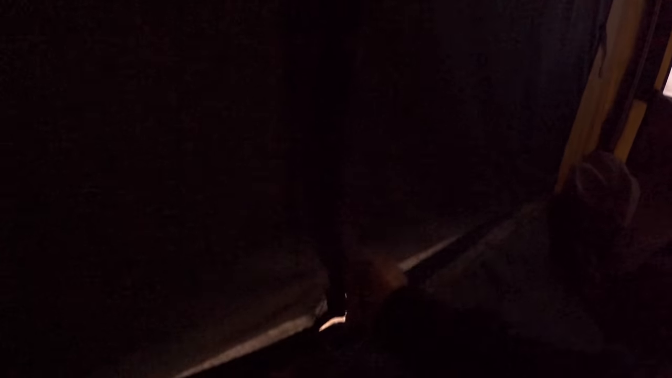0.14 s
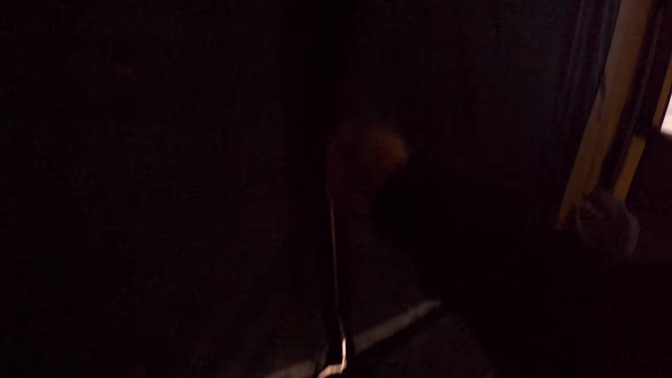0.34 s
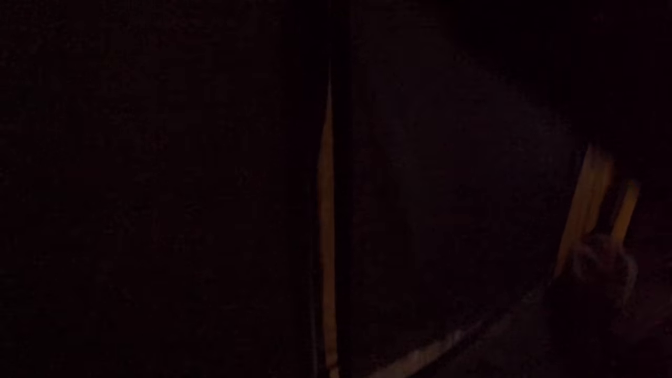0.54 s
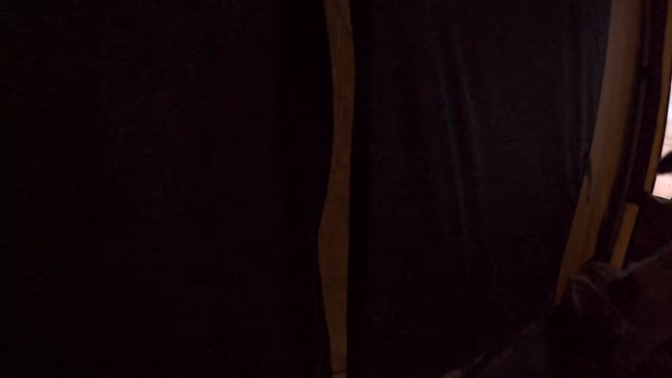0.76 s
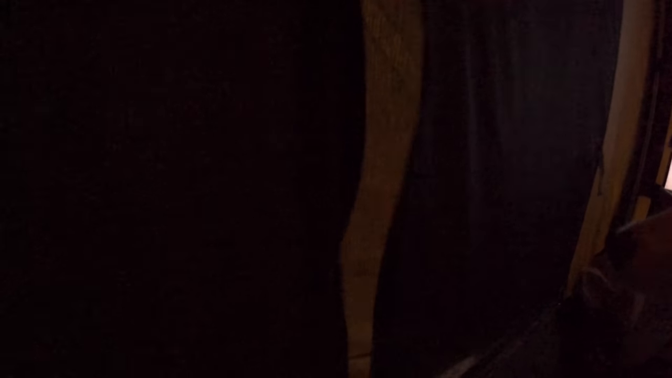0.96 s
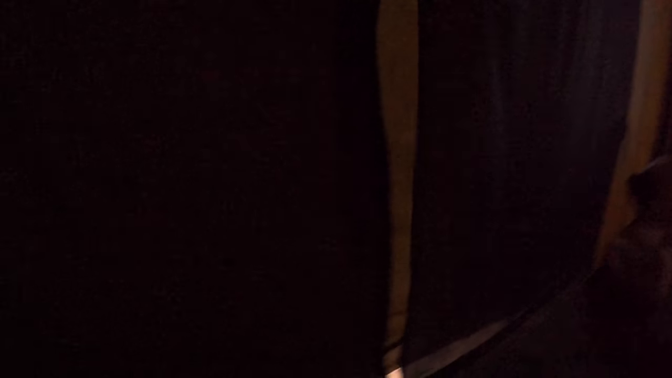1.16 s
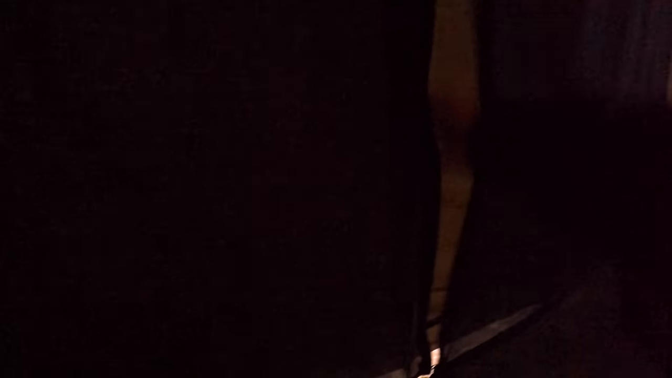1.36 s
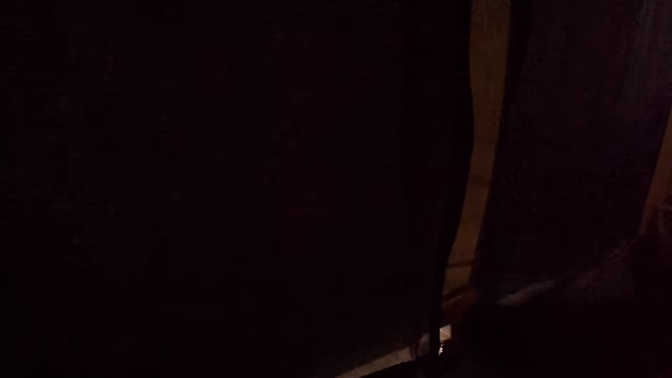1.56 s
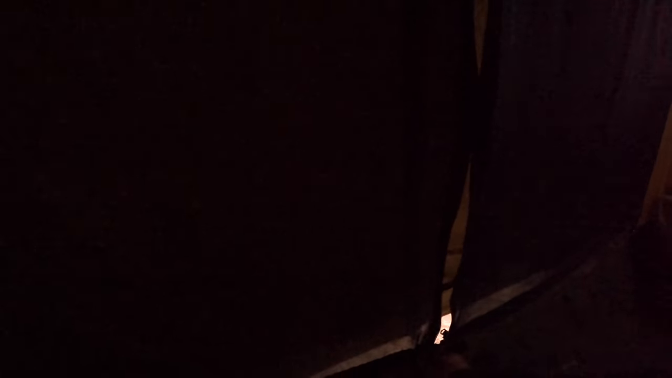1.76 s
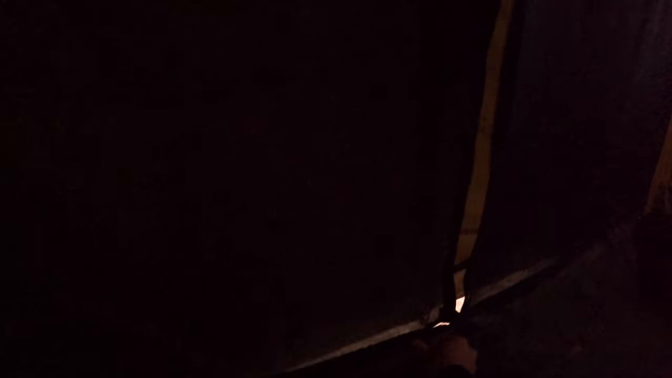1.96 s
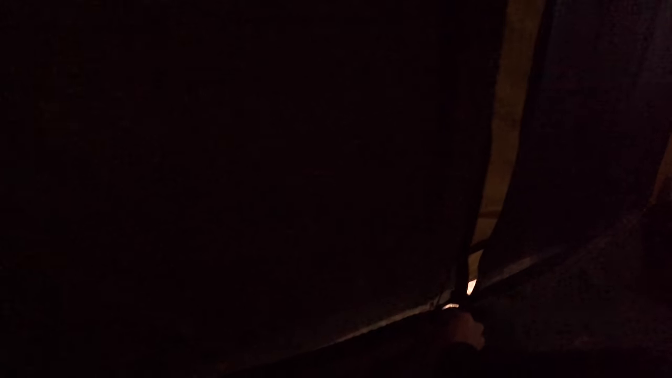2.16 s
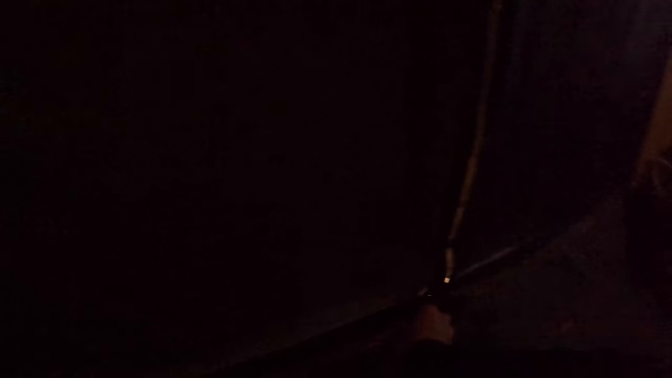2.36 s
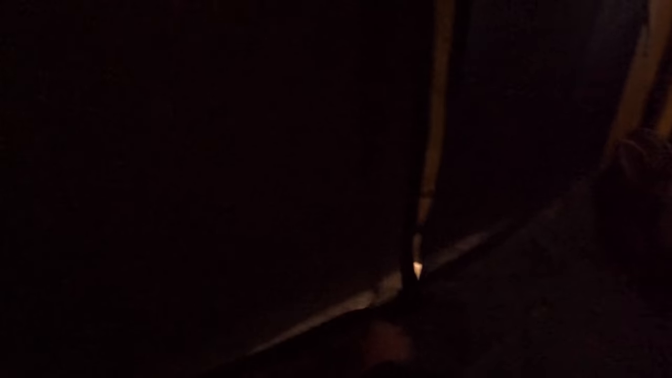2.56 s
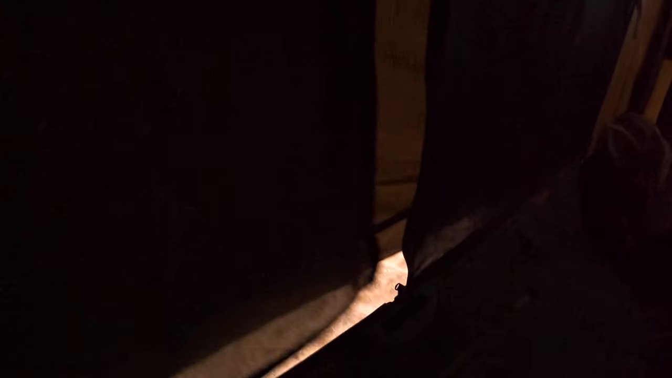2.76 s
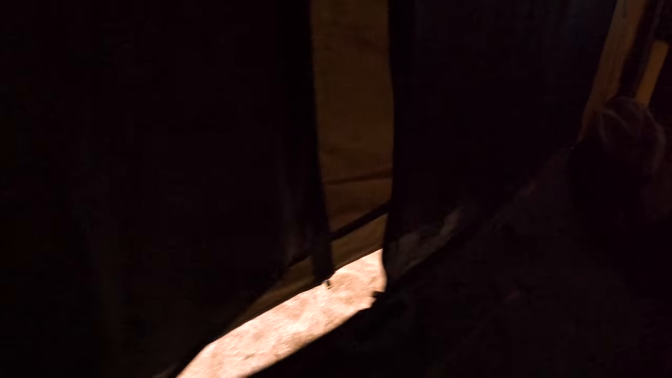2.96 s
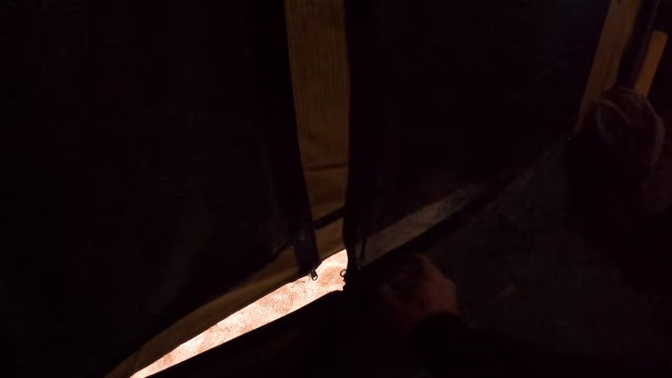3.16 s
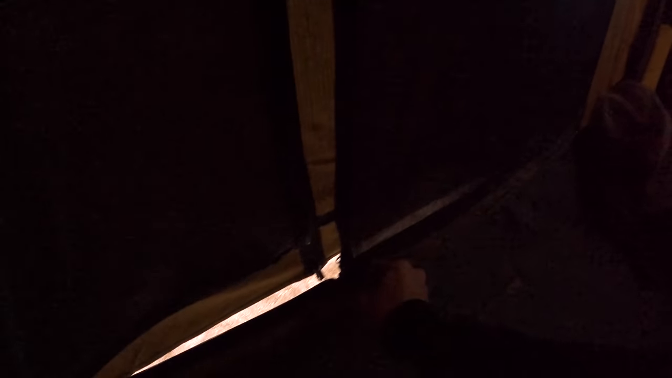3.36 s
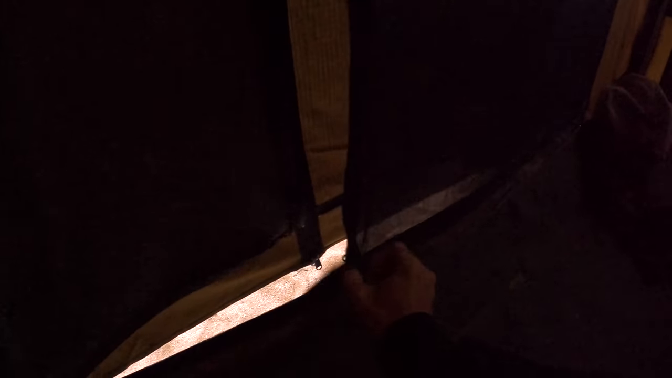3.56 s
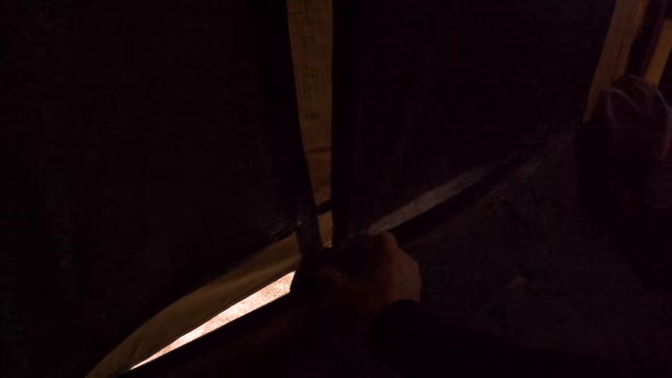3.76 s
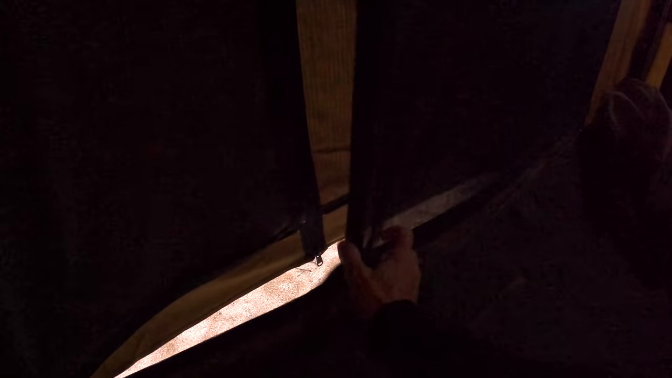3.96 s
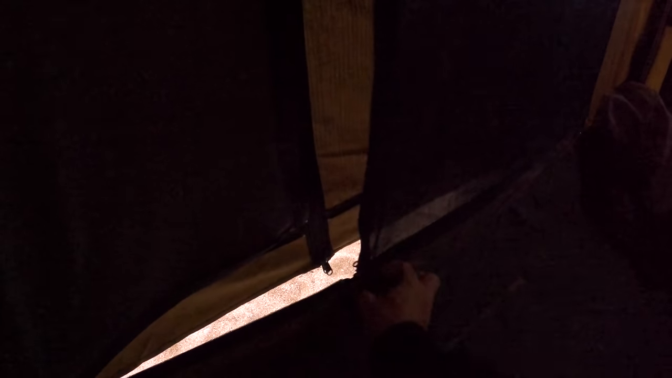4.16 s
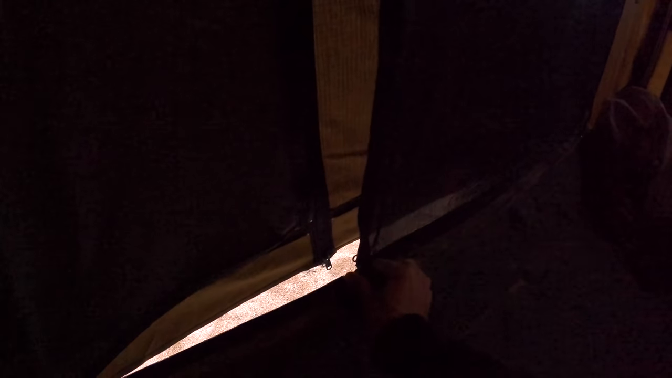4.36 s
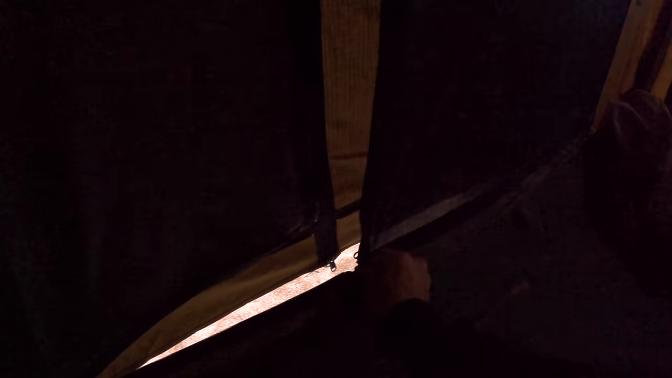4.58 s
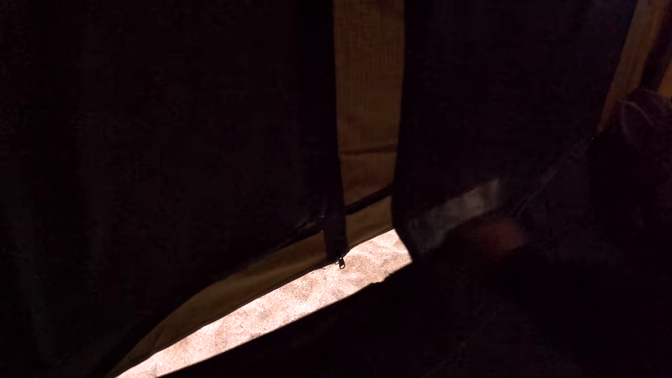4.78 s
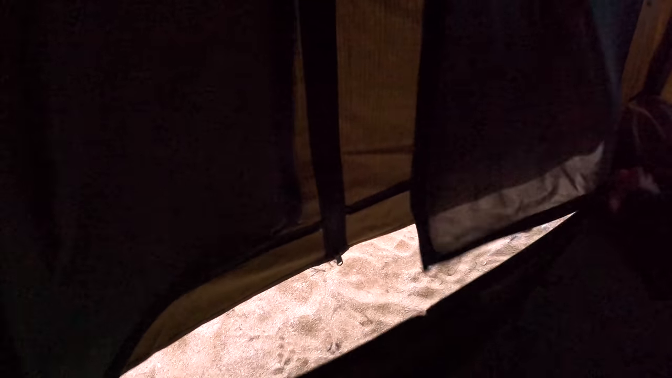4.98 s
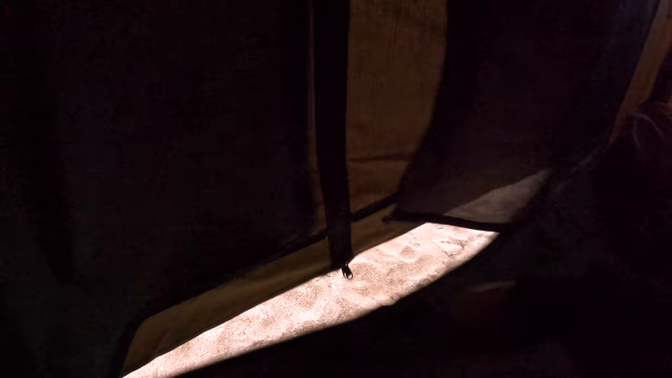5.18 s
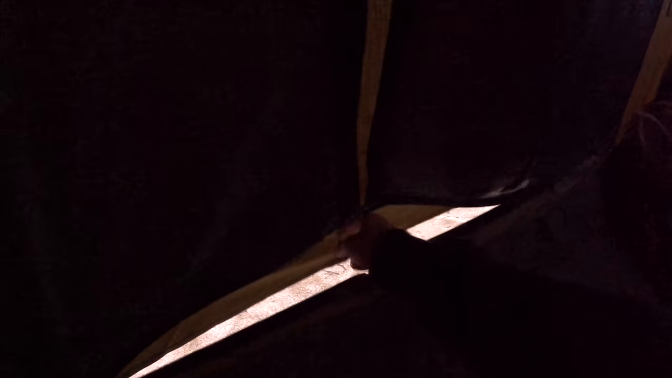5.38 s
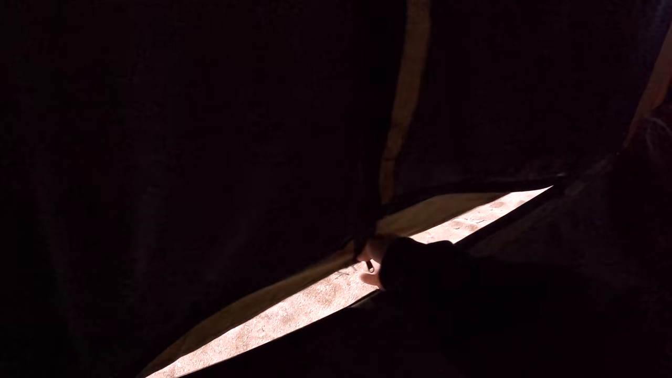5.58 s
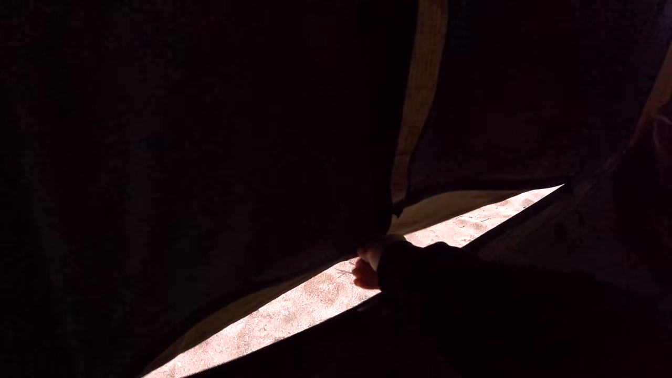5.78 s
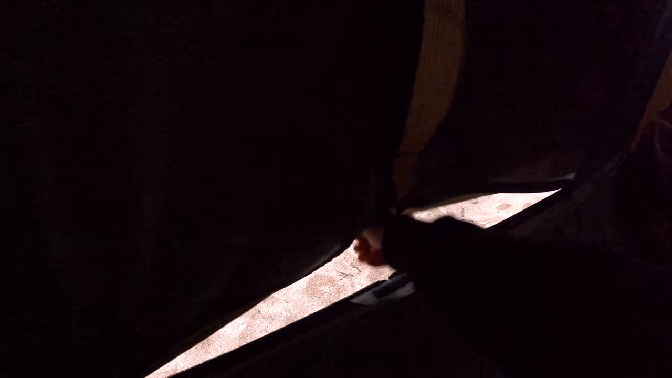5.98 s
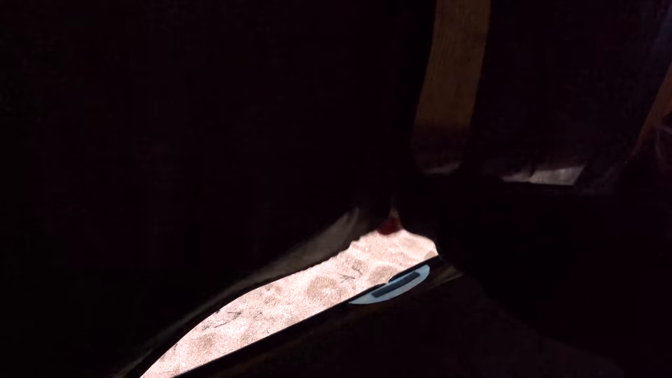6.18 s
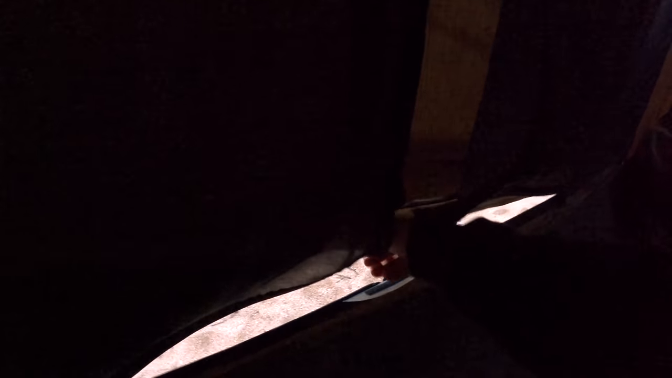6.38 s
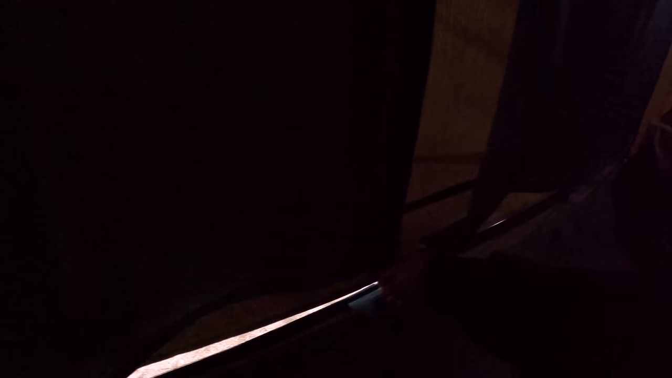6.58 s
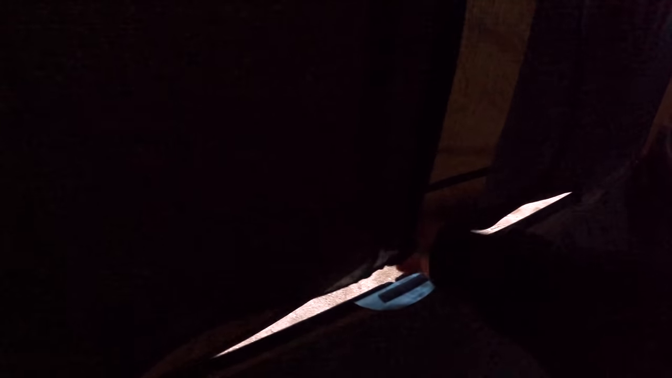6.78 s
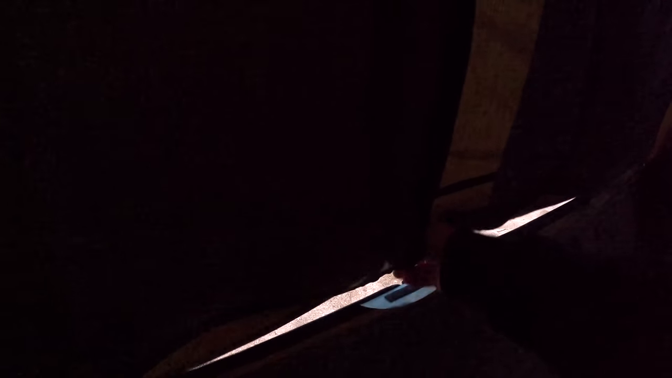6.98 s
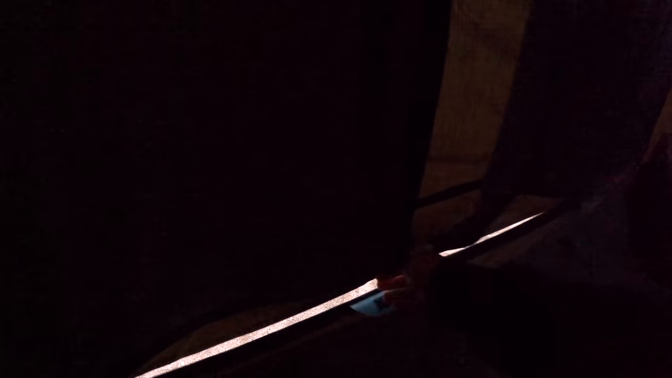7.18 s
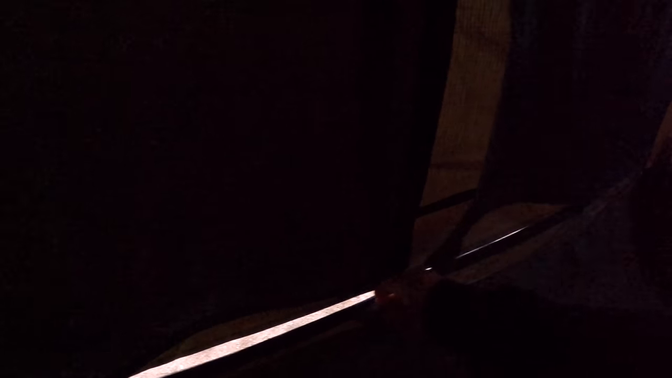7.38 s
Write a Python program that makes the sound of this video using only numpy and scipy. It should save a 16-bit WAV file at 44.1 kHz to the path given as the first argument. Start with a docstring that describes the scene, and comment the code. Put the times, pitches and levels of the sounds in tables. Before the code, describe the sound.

Close, dry stereo sound inside a tent, with a steady low outdoor rumble and faint hiss throughout. Light cloth movement and tiny high metal tab clinks open the scene. From about 0.2 to 1.1 s a zipper is pulled in one long stroke: teeth click, speed up and fuse into a buzzing whine that holds, brightens, then drops as it stops. Between 1.1 and 1.8 s come tab ticks, soft low fabric flaps and rustling, then a quieter pause. At 2.7 s a short, louder zip rises and falls in 0.3 s. From 3.2 to 4.4 s the cloth is rubbed, with brief squeaks, small snaps, tinkles and low flaps. Another sharp short zip comes at 4.85-5.15 s, ending in a dry snap. Scuffs and clinks continue to 5.7 s; afterwards sparse faint rubbing, a soft flap at 6.2 s and tab ticks near 6.5-6.7 s thin out over the rumble.

```python
"""Inside a tent the cloth is handled and metal pull tabs tinkle as decaying modes; this recurs between strokes.
First a zipper is pulled in one long stroke up the door, then two short strokes follow along its foot.
In each, teeth click through the slider and fuse into a whine whose pitch rises and falls with its speed.
Throughout, shaped noise gives a low steady rumble from outdoors."""
import sys
import numpy as np
from scipy import signal
from scipy.fft import rfft, irfft, next_fast_len
from scipy.io import wavfile
from scipy.ndimage import uniform_filter1d

SR = 44100
rng = np.random.default_rng(int(sys.argv[2]) if len(sys.argv) > 2 else 0)


def digitize_waveform(pressure):
    """Quantize a signal to 16-bit integers and store it at the path in sys.argv[1].

    Rows of a 2-D input are taken as channels; values are limited to [-1, 1].
    """
    field = np.atleast_2d(pressure).T
    bounded = np.clip(field, -1, 1)
    quanta = np.round(bounded * 32767).astype(np.int16)
    wavfile.write(sys.argv[1], SR, quanta)


N = 328041
TIME = np.arange(N) / SR

# speed of the slider in each stroke: time_s, tooth_rate_per_s
UP_PULL = [(0.22, 180), (0.32, 490), (0.385, 810), (0.425, 865), (0.46, 990), (0.51, 1040), (0.57, 1030),
           (0.66, 1085), (0.73, 1000), (0.91, 1100), (0.97, 1000), (1.005, 650), (1.08, 99)]
LEFT_PULL = [(2.665, 169.8), (2.72, 597.6), (2.755, 937), (2.815, 1215), (2.865, 1262), (2.895, 983),
             (2.925, 573), (2.965, 161.1)]
RIGHT_PULL = [(4.845, 189.7), (4.89, 571.3), (4.935, 934), (4.972, 1297), (4.99, 1233), (5.012, 1362),
              (5.035, 1361), (5.06, 1061), (5.085, 607), (5.15, 144.4)]
# colour of the zipper tape in each stroke: frequency_hz, density_db (per Hz, relative)
UP_TAPE = [(300, -24), (700, -20), (1100, -4), (1900, 2.5), (2700, -3), (4000, -5), (5500, -3),
           (7200, -7.5), (9000, -12.5), (10700, -15.5), (12000, -22), (15000, -31)]
LEFT_TAPE = [(300, -11), (700, -2), (1100, -3), (1600, -3), (2400, -1.5), (3700, 2), (5000, -0.5),
             (7000, -6), (8500, -12), (11000, -16.5), (15000, -30)]
RIGHT_TAPE = [(300, -24), (700, -8), (1100, -0.5), (2100, 4.5), (3100, -2.5), (4000, -1), (5400, -2),
              (7800, -6.5), (9500, -12), (12500, -18.5), (15000, -31)]
# balance of each stroke, the treble leaning right: frequency_hz, left_minus_right_db
UP_LEAN = [(1000, -1), (2400, 0.5), (4400, -2), (8000, -4.5), (15000, -3)]
LEFT_LEAN = [(1000, -1), (3500, 2.5), (5000, -3), (8000, -4), (15000, -3)]
RIGHT_LEAN = [(1000, -3.5), (2800, 2), (4400, -3), (8000, -8.5), (15000, -8)]
# extra level of the two tones along the long stroke: time_s, tooth_note_db, octave_db
UP_SINGING = [(0.28, -4, 12), (0.36, 3, 14.5), (0.43, 4, 15), (0.455, -0.5, 5.5), (0.55, 4, 19.5),
              (0.635, 1, 15.5), (0.66, 0, 3.5), (0.7, -5.5, 14), (0.79, -8.5, -1.5), (0.96, 6.5, -1.5),
              (1.01, -4, 5)]
# resonances of each half of the door, met by the gliding tooth note and octave: frequency_hz, gain_db
LEFT_PANEL = [(400, 1), (800, -13), (1000, -2), (1220, 0), (1500, -14), (2000, -6), (2500, 1.5)]
RIGHT_PANEL = [(400, -9), (750, -9.5), (1050, -2.5), (1300, -4.5), (1550, -3), (1850, 1.5), (2150, -4),
               (2700, -7.5)]
# likeness of the two sides: frequency_hz, likeness_0_to_1
NEAR_LIKENESS = [(300, .97), (1400, 0.68), (2500, 1), (4000, 0.75), (7000, 0.17), (15000, 0)]
AIR_LIKENESS = [(25, 0.8), (70, 0.98), (140, 1), (300, 1), (700, 0.86), (2000, 0.64), (5000, 0.36),
                (12000, 0.06)]
# a pull tab knocks against its slider: start_s, ring_db (relative), top_mode_brightness_db
TAB_KNOCKS = [(0.105, -49, -20), (0.188, -46.5, -19), (0.244, -40, -31), (0.2844, -41, -35),
              (1.1237, -52, -25), (1.159, -49, -21), (1.4676, -43.5, -25), (1.8094, -68, -16),
              (3.2165, -50, -28), (3.2944, -49, -19), (3.4915, -42.5, -28), (4.2712, -53.5, -22),
              (4.3665, -49, -31), (5.1997, -46, -14), (5.44, -50, -28), (5.6022, -63, -2),
              (6.4722, -57, -17), (6.698, -45.5, -30)]
# modes of a pull tab: frequency_hz, level_db (relative), t60_s
TAB_MODES = [(6234, 3, 0.1), (9800, -6, .13), (14960, 6, 0.14)]
# the cloth snaps or scuffs and single teeth catch: start_s, peak_db (before widening), centre_hz, decay_s
SNAPS = [(.019, -34.5, 9450, 0.00036), (1.267, -26, 900, 0.00087), (2.467, -44, 4300, 0.0041),
         (3.631, -38, 2160, 0.0054), (3.758, -37.5, 3350, 0.0033), (3.999, -47, 4700, .004),
         (4.189, -32, 2580, 0.0023), (5.125, -19, 1590, 0.00043), (5.195, -28, 1570, 0.00059),
         (5.249, -31, 1390, 0.00063), (5.349, -39, 6860, 0.0022), (5.553, -27, 1420, 0.0075),
         (5.575, -31.5, 2300, 0.0066), (5.602, -29, 3920, 0.00035), (5.624, -34, 3200, 0.0017),
         (6.141, -45, 3800, 0.016)]
# the door cloth is tugged taut and flaps: start_s, swing_db (relative), swing_hz, puff_db (relative)
FLAPS = [(0.088, -17.5, 117, -31), (1.224, -20, 188, -26.5), (1.254, -19, 27.2, -29),
         (1.436, -20.5, 32, -25.5), (1.625, -13.5, 46.3, -32), (3.964, -18, 35.0, -31),
         (4.033, -18, 118, -33), (4.1, -21, 29.4, -30.5), (5.124, -29, 124, -32.5),
         (5.192, -24, 26.76, -43), (5.449, -21, 27.3, -43), (6.205, -18, 136, -29)]
# the hand slips on the cloth and it squeaks: start_s, length_s, first_hz, last_hz, level_db
SQUEAKS = [(3.291, 0.023, 3510, 2930, -45), (3.332, 0.026, 4500, 4050, -43),
           (3.357, 0.017, 1890, 2160, -37), (3.372, 0.016, 2200, 1670, -33.5)]
# cloth slides under the hand, swelling and dying away: height_s, spread_s, level_db (relative)
RUBS = [(0.197, .25, -62), (1.127, 0.15, -61.5), (1.354, 0.2, -56.5), (1.49, 0.034, -69), (1.792, .06, -57),
        (2.452, .2, -73), (3.375, 0.21, -59), (3.855, 0.033, -58.5), (4.009, 0.047, -56),
        (4.233, 0.18, -64), (5.193, 0.12, -55.5), (5.36, 0.076, -56), (5.6, 0.079, -55.5),
        (6.28, 0.34, -65.5), (7.002, .02, -59)]
# colour of rubbed cloth: frequency_hz, density_db (per Hz, relative)
CLOTH = [(500, -51), (1200, -11), (2500, 5.5), (4500, 1), (6500, 0.5), (8500, -8), (12000, -17),
         (15000, -27)]
# colour of the outdoor air: frequency_hz, density_db (per Hz, relative)
AIR = [(12, -43), (20, -8.5), (43, -5), (70, -4.5), (103, -1.5), (211, -3.5), (249, -5), (310, -11),
       (387, -13.5), (656, -19.5), (713, -24), (1080, -22), (2280, -26), (6720, -41), (15000, -75)]

# faint crackles fall at random before the cloth settles; between rubs it stirs, less as the door comes loose
CRACKLE_DB, CRACKLE_HZ, CRACKLE_DECAY_S = -52, 4500, .0015   # middle of the level and pitch ranges
STIR_DB, SETTLE_DB_PER_S, SETTLE_FROM_S = -65.5, 3.5, 3.4    # STIR_DB is relative, like the rub levels
AIR_DB = -33.5
RIGHT_LEAD_S, AIR_RIGHT_LEAD_S = .00004, .00008
CUTOFF_HZ = 15500


def from_db(db):
    """Logarithmic level: decibels become an amplitude ratio."""
    return 10 ** (np.asarray(db) / 20)


def rms_one(x):
    """Normalisation: the mean power becomes one."""
    return x / np.sqrt(np.mean(x ** 2) + 1e-20)


def at_hz(points, hz):
    """Logarithmic pitch: a curve is interpolated along log frequency."""
    points = np.array(points)
    return np.interp(np.log(np.maximum(hz, 1)), np.log(points[:, 0]), points[:, 1])


def columns_at(rows, t):
    """Linear interpolation: every column of a curve is read at the times t."""
    s, *columns = np.transpose(rows)
    return [np.interp(t, s, c) for c in columns]


def filtered(x, gain_at):
    """Linear filtering: the spectrum is multiplied by a gain that depends on frequency."""
    size = next_fast_len(x.shape[-1] + 512)
    spectrum = rfft(x, size) * gain_at(np.fft.rfftfreq(size, 1 / SR))
    return irfft(spectrum, size)[..., :x.shape[-1]]


def coloured(x, spectrum):
    """Spectral shaping: x is filtered to a colour and brought to rms 1."""
    return rms_one(filtered(x, lambda hz: from_db(at_hz(spectrum, hz))))


def wander(corner_hz, size):
    """Slow random fluctuation: low-passed noise of rms 1."""
    return rms_one(filtered(rng.standard_normal(size), lambda hz: 1 / (1 + (hz / corner_hz) ** 2)))


def spread(mid, side, likeness):
    """Interchannel coherence: shared and opposed parts are weighted by likeness at each frequency."""
    def alike(hz):
        return np.clip(at_hz(likeness, hz), 0, .999)
    shared = filtered(mid, lambda hz: np.sqrt(1 + alike(hz)))
    opposed = filtered(side, lambda hz: np.sqrt(1 - alike(hz)))
    return shared + opposed * [[1], [-1]]


def panned(x, lean_db):
    """Level difference between sides: left is made louder than right by lean_db."""
    return x * from_db(np.array([[1], [-1]]) * lean_db / 2)


def right_first(x, lead_s):
    """Time difference between sides: a linear phase delays the left by lead_s."""
    return filtered(x, lambda hz: np.exp(-2j * np.pi * hz * lead_s * np.array([[1], [0]])))


def faded(t, fade_s):
    """Gradual onset and release: linear ramps at both ends of a stretch of time."""
    return np.clip(np.minimum(t - t[0], t[-1] - t) / fade_s, 0, 1)


def add(out, s, sound):
    """Superposition: a sound is summed in at time s."""
    start = max(round(s * SR), 0)
    out[..., start:start + sound.shape[-1]] += sound[..., :N - start]


def band(x, low_hz, high_hz):
    """Band limiting: a causal filter passes one range of frequencies."""
    edges_hz = [max(low_hz, 10), min(high_hz, .45 * SR)]
    return signal.sosfilt(signal.butter(2, edges_hz, "band", fs=SR, output="sos"), x)


def zipper(pull, tape, lean, jitter, whine_db, brighten_db, harder_db, rasp_db, knee_per_s, press_db,
           note_db, octave_db, handover_db, panel, rough, slop, singing=((0, 0, 0),), doubling_db=13):
    """Periodic impacts: each tooth clicks through the slider, and at speed the clicks fuse into a whine."""
    t = TIME[(TIME >= pull[0][0]) & (TIME <= pull[-1][0])]
    size = len(t)
    teeth_per_s, = columns_at(pull, t)
    speed = teeth_per_s / teeth_per_s.max()
    along = np.linspace(-.5, .5, size)
    # louder with each doubling of speed, levelling off above a knee
    pull_db = doubling_db * np.log2(teeth_per_s / np.hypot(teeth_per_s, knee_per_s))
    # the rasp also changes along the stroke with the pressure of the hand
    pressed_db = rasp_db + press_db * along
    # the slider runs least evenly when it is slow
    uneven_rate = jitter * teeth_per_s.max() / speed * wander(110, size)
    teeth = np.cumsum(teeth_per_s + uneven_rate) / SR

    def partial(order, fading_db, slip):
        """Harmonic motion: a multiple of the tooth rate fades and smears as the slider moves over cloth."""
        grain = rough / speed * (wander(230, size) + 1j * wander(170, size))
        cycles = order * (teeth + slip * wander(137, size)) + rng.random()
        turn = np.exp(2j * np.pi * cycles)
        tone = np.real(turn * (1 + grain)) / np.sqrt(1 + 2 * (rough / speed) ** 2)
        return rms_one(tone * from_db(fading_db * wander(24, size)))

    def row(uneven_db=1.0, scrape_db=-2):
        """Fusion of impacts: loose clicks and scraping give way to overtones as the speed rises."""
        passed = np.maximum.accumulate(np.floor(teeth + slop * wander(500, size)))
        strength = from_db(uneven_db * np.clip(rng.standard_normal(size), -2, 2))
        clicks = np.diff(passed, prepend=passed[0]) * strength
        clicks = rms_one(clicks - uniform_filter1d(clicks, size=256))
        # the scrape dies away after each tooth
        scrape = rms_one(rng.standard_normal(size) * np.exp(-2.5 * (teeth % 1)))
        overtones = sum(partial(k, fading_db=4.0, slip=slop / 5) / (1 + (k / 8.1) ** 3) for k in range(3, 11))
        whine = from_db(whine_db) * speed ** 3
        loose = rms_one(clicks + from_db(scrape_db) * scrape)
        return (loose + whine * rms_one(overtones)) / np.sqrt(1 + 2 * whine ** 2)

    rasp = coloured(spread(row(), row(), NEAR_LIKENESS), tape)
    # fast teeth strike harder, and the sound brightens along the stroke
    treble = filtered(rasp, lambda hz: hz ** 4 / (hz ** 4 + 4200 ** 4))
    tilt_db = brighten_db * along + harder_db * (speed - .7)
    rasp = treble * from_db(tilt_db / 2) + (rasp - treble) * from_db(-tilt_db / 2)
    # the tooth note and its octave stand out of the rasp; handover_db shifts the balance between them
    first_db, second_db = columns_at(singing, t)
    note_level_db = note_db + handover_db * along + first_db + at_hz(panel, teeth_per_s)
    octave_level_db = octave_db - handover_db * along + second_db + at_hz(panel, 2 * teeth_per_s)
    note = from_db(note_level_db) * partial(0.99, fading_db=2.64, slip=0.0097)
    octave = from_db(octave_level_db) * partial(2, fading_db=2.64, slip=0.022)
    stroke = from_db(pull_db) * (from_db(pressed_db) * rasp + note + octave) * faded(t, fade_s=0.021)
    return filtered(stroke, lambda hz: panned(1.0, at_hz(lean, hz)))


def tabs(tick_db=24, tick_s=0.0043, lean_db=-4, chatter_db=4.0, uneven_db=3.5):
    """Modal decay: after a sharp tick the little metal tab rings on and chatters in its loop."""
    out, t = np.zeros((2, N)), TIME[:SR // 4]
    for s, ring_db, bright_db in TAB_KNOCKS:
        burst = rng.standard_normal((2, len(t))) * np.sqrt(t / tick_s) * np.exp(-t / tick_s)
        # brighter knocks also have a louder tick
        knock = from_db(ring_db + bright_db + tick_db) * band(burst, 4500, 11000)
        brightness = [(TAB_MODES[0][0], 0), (TAB_MODES[-1][0], bright_db)]
        for hz, mode_db, t60 in TAB_MODES:
            phase = 2 * np.pi * hz * t + 0.57 * wander(250, len(t)) + rng.normal(0, 1.0, (2, 1))
            struck_db = ring_db + at_hz(brightness, hz) + rng.normal(0, uneven_db)
            ring = from_db(struck_db + mode_db - 60 * t / t60 + chatter_db * wander(120, len(t)))
            knock = knock + ring * np.sin(phase) * faded(t, fade_s=0.0011)
        add(out, s, knock)
    return panned(out, lean_db)


def snaps(tail_db=-20, tail_s=0.013, width=1.67, lean_db=-2):
    """Impulsive release: short dry bursts of band noise, each with a brief flutter after it."""
    out, t = np.zeros((2, N)), TIME[:SR // 8]
    for s, peak_db, hz, decay_s in SNAPS + crackles(count=6):
        swell = t / decay_s * np.exp(1 - t / decay_s) + from_db(tail_db) * np.exp(-t / tail_s)
        burst = band(rng.standard_normal((2, len(t))) * swell, hz / width, hz * width)
        add(out, s, from_db(peak_db) * burst / np.abs(burst).max(axis=1, keepdims=True))
    return panned(spread(*out, NEAR_LIKENESS), lean_db)


def crackles(count):
    """Random events: faint snaps at chance times, each with its own strength and pitch."""
    return [(SETTLE_FROM_S * when, CRACKLE_DB + 6 * (hard - .5), CRACKLE_HZ * 2 ** (pitch - .5), CRACKLE_DECAY_S)
            for when, hard, pitch in rng.random((count, 3))]


def flaps(level_db=-2, cycles=0.9, puff_gain_db=0.1, puff_s=0.029):
    """Damped oscillation: the cloth pushes the air in a low swing with a soft puff."""
    out, t = np.zeros(N), TIME[:SR // 4]
    for s, swing_db, hz, puff_db in FLAPS:
        # the swing falls by a factor e every `cycles` periods
        swing = from_db(swing_db + level_db) * np.sin(2 * np.pi * hz * t) * np.exp(-t * hz / cycles)
        puff = band(rng.standard_normal(len(t)) * np.exp(-t / puff_s), 108, 520)
        puff = from_db(puff_db + puff_gain_db) * puff / np.abs(puff).max()
        add(out, s, (swing + puff) * faded(t, fade_s=0.0013))
    return out


def squeaks(waver=0.072):
    """Stick-slip friction: brief tones glide with an unsteady pitch."""
    out = np.zeros(N)
    for s, length_s, first_hz, last_hz, level_db in SQUEAKS:
        size = round(length_s * SR)
        hz = np.linspace(first_hz, last_hz, size) * (1 + waver * wander(600, size))
        tone = np.sin(2 * np.pi * np.cumsum(hz) / SR)
        add(out, s, from_db(level_db) * signal.windows.tukey(size, .7) * tone)
    return out


def rustle(level_db=6, grain_db=2.5, lean_db=-4.0, restless_db=-1.0):
    """Friction noise: cloth rubs on cloth in small clumps, adding in power to a restless stirring."""
    settled_db = SETTLE_DB_PER_S * np.maximum(TIME - SETTLE_FROM_S, 0)
    stir = from_db(STIR_DB - settled_db + restless_db * wander(8.6, N))
    rub_power = sum((from_db(db) * np.exp(-2 * ((TIME - s) / spread_s) ** 2)) ** 2 for s, spread_s, db in RUBS)
    level = from_db(level_db) * np.sqrt(stir ** 2 + rub_power)
    grains = rng.standard_normal((2, N)) * from_db(grain_db * wander(140, N))
    return panned(level * coloured(spread(*grains, NEAR_LIKENESS), CLOTH), lean_db)


def outdoors(swell_db=1.3):
    """Broadband noise: a steady low rumble under a faint hiss, swelling slightly."""
    air = coloured(spread(*rng.standard_normal((2, N)), AIR_LIKENESS), AIR)
    return air * from_db(AIR_DB + swell_db * wander(0.34, N))


def scene():
    """Superposition of sources: three strokes and the handling around them over the outdoor background."""
    up = zipper(UP_PULL, UP_TAPE, UP_LEAN, jitter=.016, whine_db=0, brighten_db=20, harder_db=-2,
                rasp_db=-31.5, knee_per_s=383, press_db=-0.5, note_db=-32.0, octave_db=-34.5,
                handover_db=1.0, panel=RIGHT_PANEL, rough=0.13, slop=.2, singing=UP_SINGING)
    left = zipper(LEFT_PULL, LEFT_TAPE, LEFT_LEAN, jitter=0.0092, whine_db=2.5, brighten_db=1, harder_db=13,
                  rasp_db=-21, knee_per_s=1140, press_db=1.5, note_db=-24.5, octave_db=-24.5,
                  handover_db=-2.0, panel=LEFT_PANEL, rough=0.17, slop=.08)
    right = zipper(RIGHT_PULL, RIGHT_TAPE, RIGHT_LEAN, jitter=0.008, whine_db=3.0, brighten_db=12, harder_db=15,
                   rasp_db=-23.5, knee_per_s=810, press_db=12.5, note_db=-25.5, octave_db=-24,
                   handover_db=15, panel=RIGHT_PANEL, rough=0.2, slop=.09)
    near = snaps() + squeaks() + rustle()
    for pull, stroke in ((UP_PULL, up), (LEFT_PULL, left), (RIGHT_PULL, right)):
        add(near, pull[0][0], stroke)
    return right_first(near, RIGHT_LEAD_S) + tabs() + flaps() + right_first(outdoors(), AIR_RIGHT_LEAD_S)


def record(dry):
    """Band limiting: the deepest bass and the top are cut."""
    dry = signal.sosfilt(signal.butter(2, 18, "high", fs=SR, output="sos"), dry)
    return signal.sosfilt(signal.ellip(10, .2, 80, CUTOFF_HZ, fs=SR, output="sos"), dry)


dry = scene()
out = record(dry)
digitize_waveform(out)
```